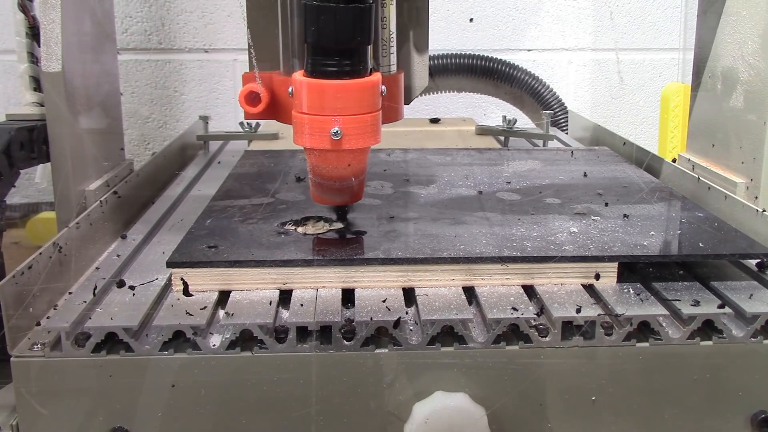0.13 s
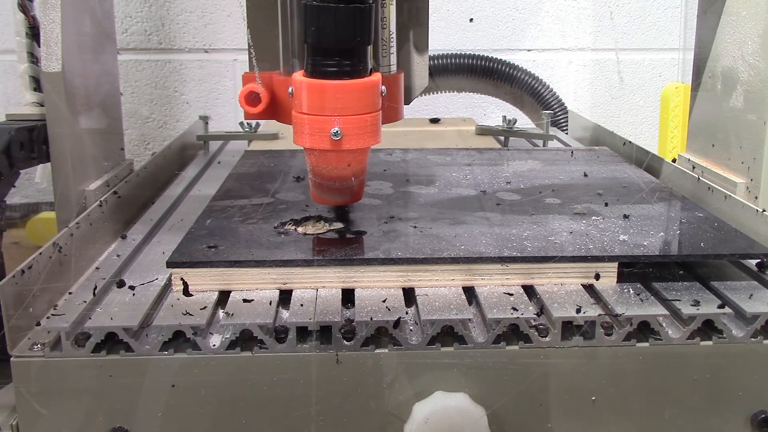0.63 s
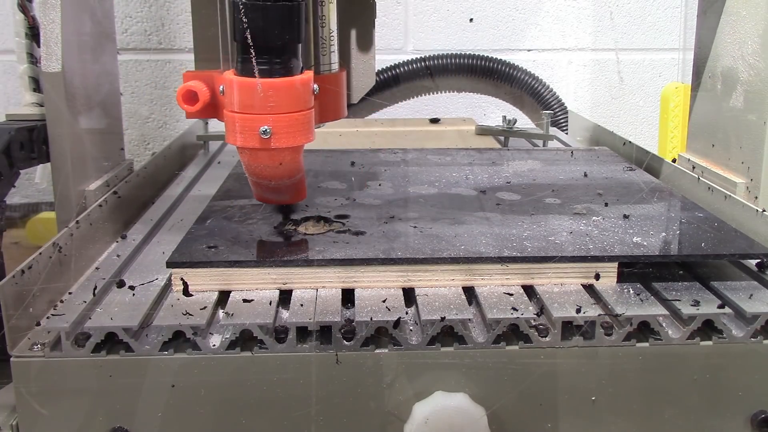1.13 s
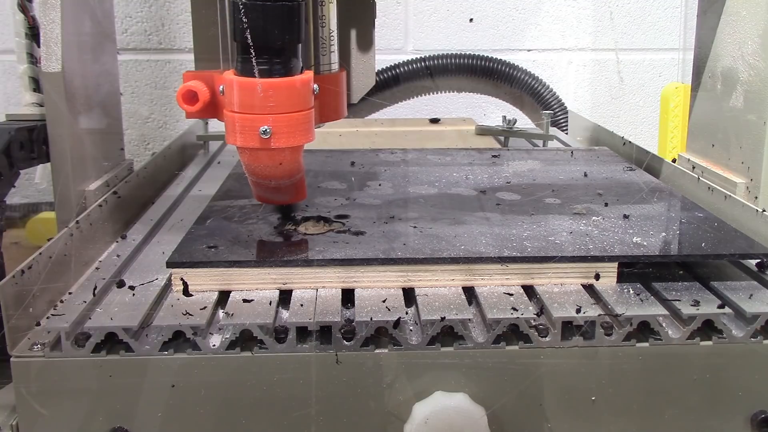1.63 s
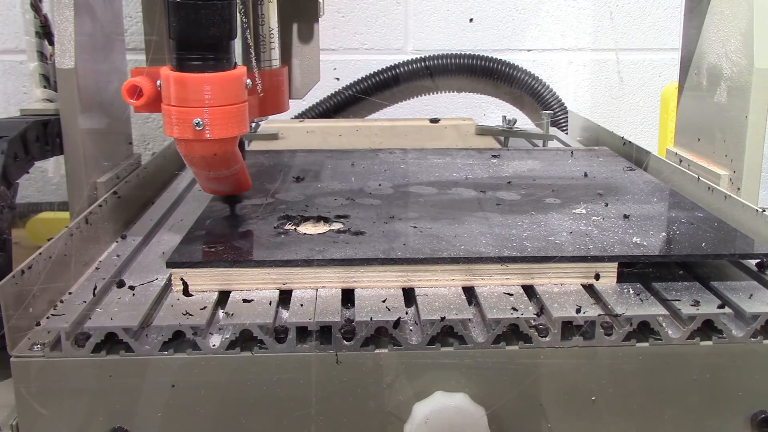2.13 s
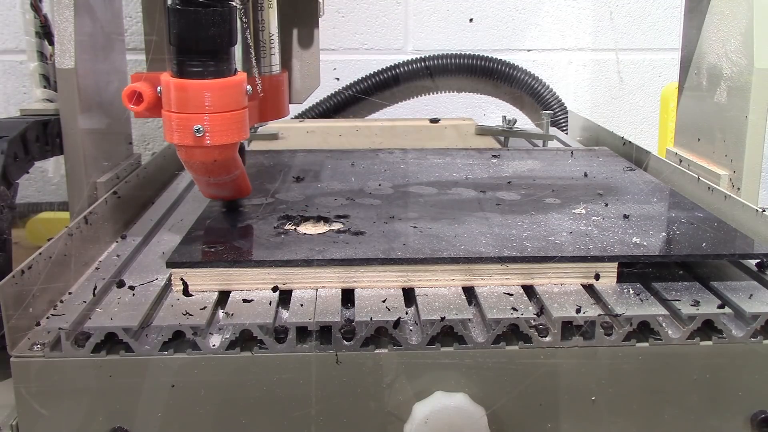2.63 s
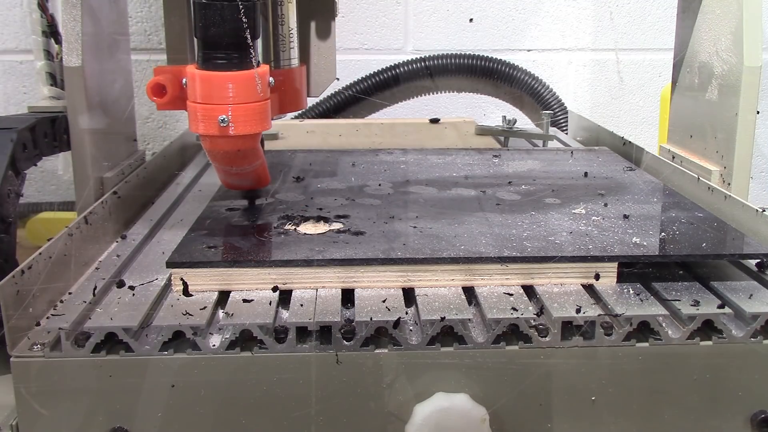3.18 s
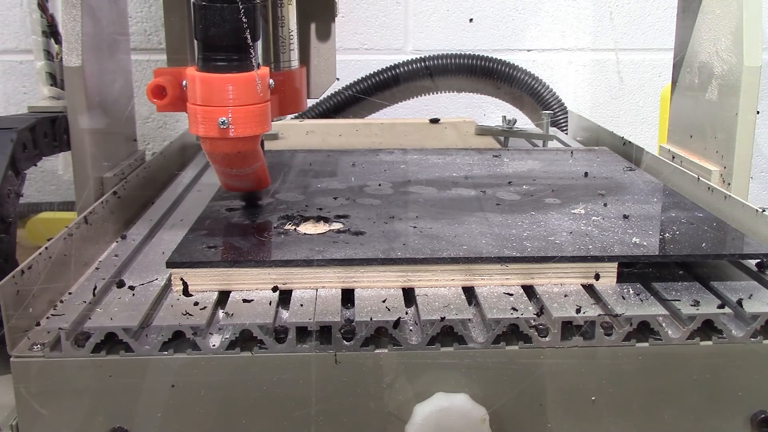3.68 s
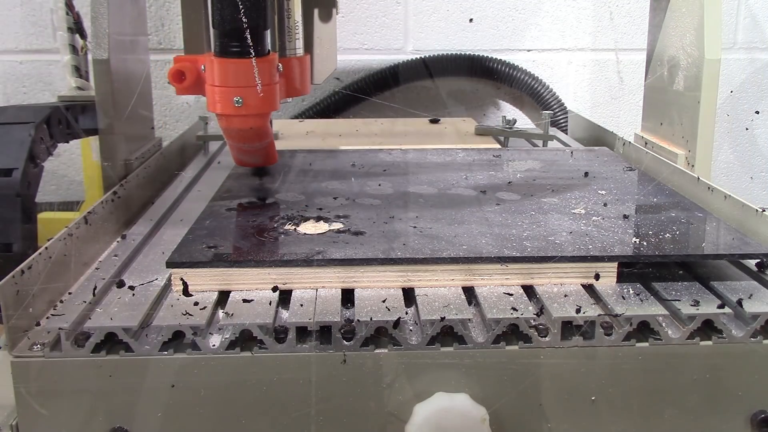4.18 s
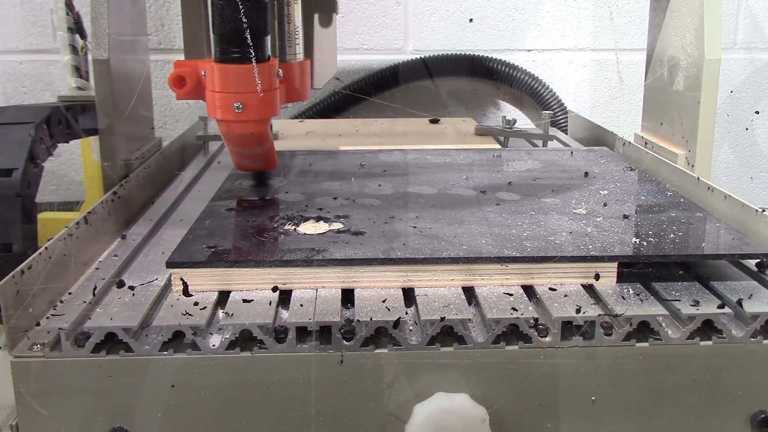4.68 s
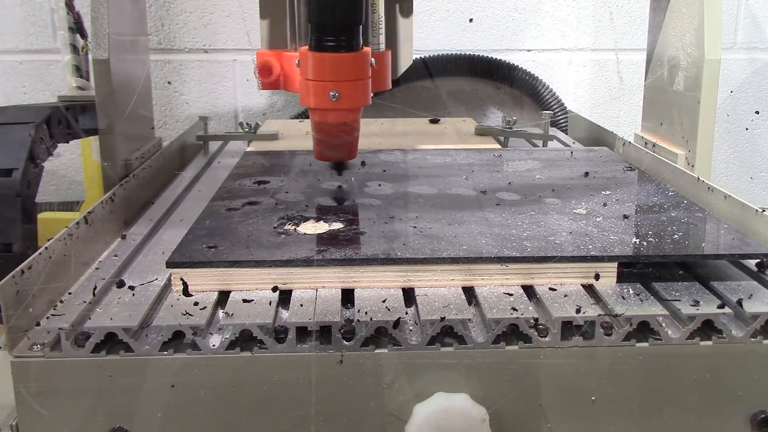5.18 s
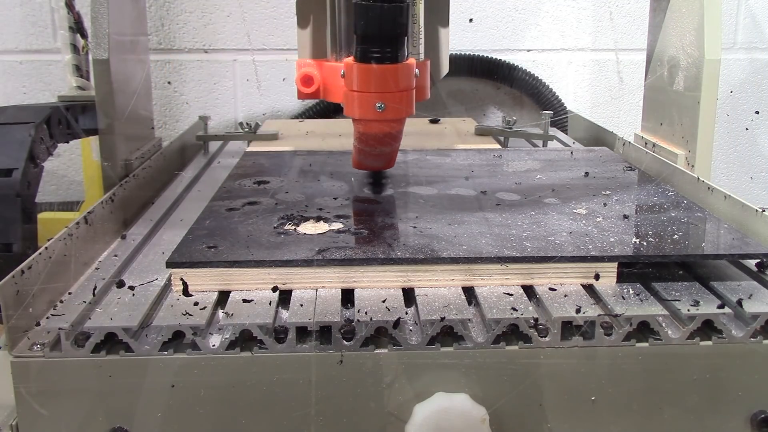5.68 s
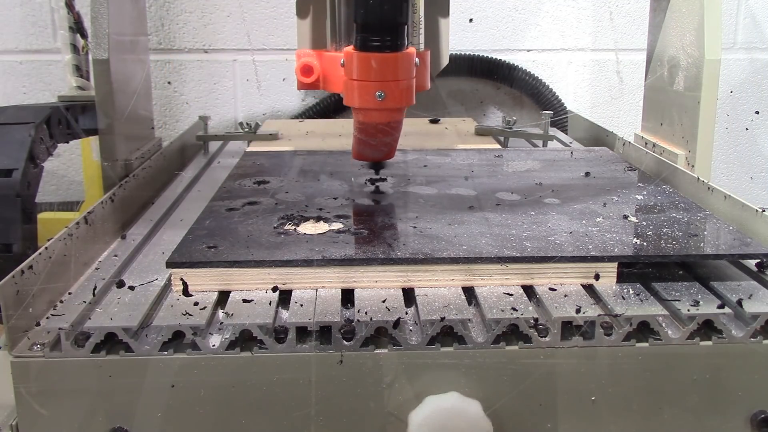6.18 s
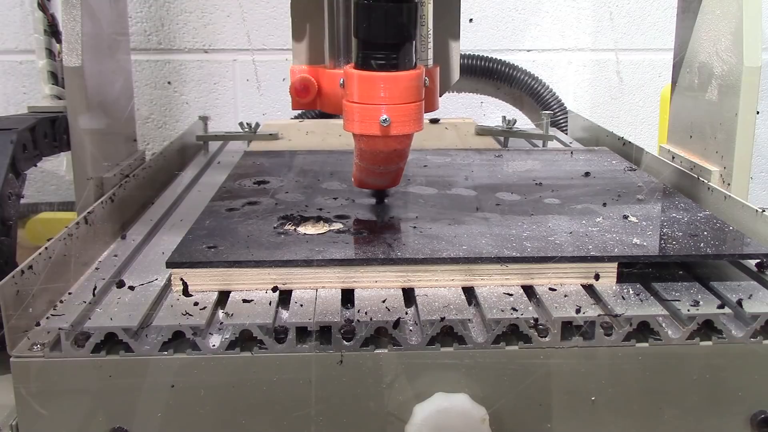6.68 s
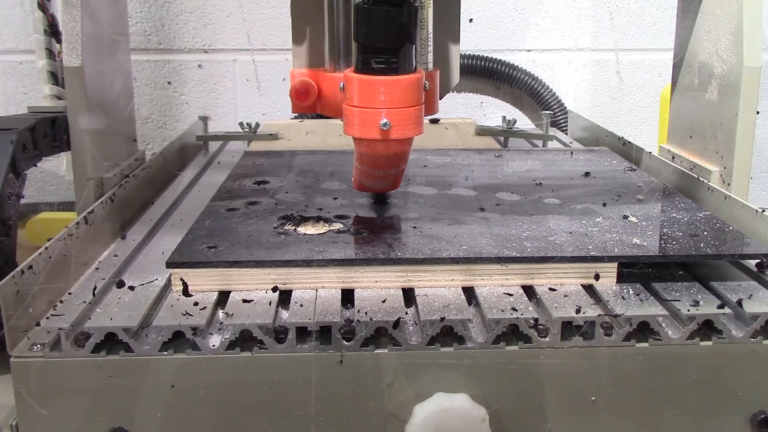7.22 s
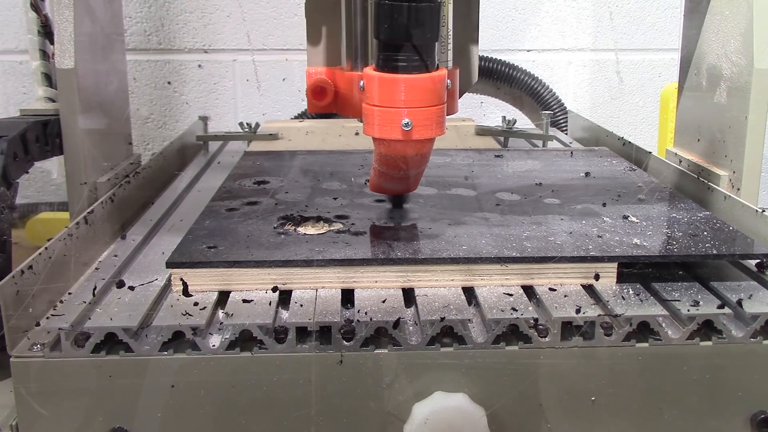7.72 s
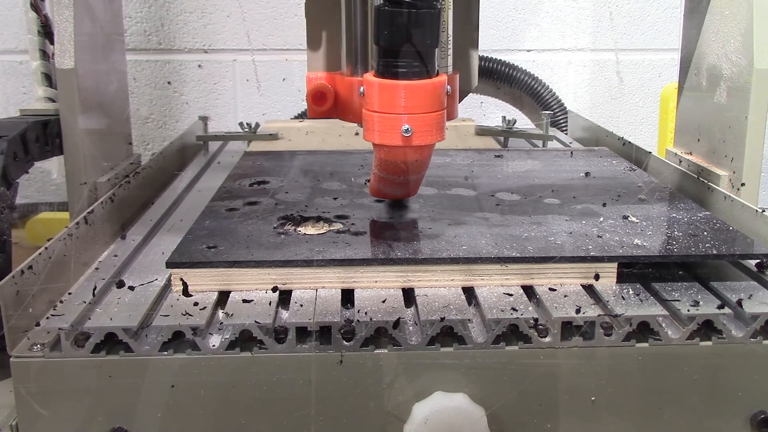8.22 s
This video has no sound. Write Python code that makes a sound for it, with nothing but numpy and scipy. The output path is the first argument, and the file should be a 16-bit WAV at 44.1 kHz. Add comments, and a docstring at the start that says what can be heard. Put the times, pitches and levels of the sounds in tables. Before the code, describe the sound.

A small CNC router drills plastic in a hard workshop, close and dry. Throughout, steady bright hiss with weaker low rumble lies under a louder, almost pure whistle around 15 kHz, trembling slightly, creeping upward and weakening toward the end. A faint mid-low shaft hum and thin motor tones hide beneath. Immediately, stepper motors chirp for about 0.15 seconds, pitch racing up, holding and dropping. Soft dull knocks follow at 0.4, 0.55, 0.8 and 1 second. Another chirp comes at 2.1, a very short one at 3.1, a longer one at 4.1. From 0.8 to 6.4, tiny falling high ticks flare irregularly on a flickering whine, clustering around 2 to 4. The hum sags near 5, with soft knocks. Brief and longer chirps come at 6.2 and 6.45, stronger knocks around 7.4 to 7.5, a short chirp at 7.6, and a last knock at 8.3.

```python
"""A small CNC router drills a plastic sheet in a hard workshop, one microphone close by.
From the start a loud, very high sine whistles over coloured noise, the hiss of air and spindle; the shaft hums.
At once the stepper motors chirp, a swept stack of harmonics, as on each later rapid move; a thin whine flickers.
Soon decaying low sines knock softly on the bed, and short falling bursts flare on the whine until past 6 s.
Meanwhile the whistle creeps up and weakens, the shaft sags near 5 s, and the last knocks close the scene."""
import sys
import numpy as np
from scipy import signal
from scipy.fft import rfft, irfft, next_fast_len
from scipy.io import wavfile
from scipy.ndimage import uniform_filter1d

SR = 44100
rng = np.random.default_rng(int(sys.argv[2]) if len(sys.argv) > 2 else 0)


def put_to_file(sound):
    """Save the sound as 16-bit audio at rate SR, in the file named by the first command-line argument."""
    columns = np.atleast_2d(sound).T  # one column per channel
    safe = np.clip(columns, -1, 1)
    whole_steps = np.round(safe * 32767)
    wavfile.write(sys.argv[1], SR, whole_steps.astype(np.int16))


def gain_from_db(level_db):
    """Convert decibel levels to linear amplitude factors (20 dB per decade)."""
    decades = np.asarray(level_db, float) / 20
    return 10 ** decades


N = 367794
TIME = np.arange(N) / SR


def curve(table):
    """Columns of a table, after the time column, as sample-by-sample curves."""
    s, *columns = np.transpose(table)
    return [np.interp(TIME, s, c) for c in columns]


def steps(table, slew_s):
    """A level that holds from one row to the next and slides over in slew_s."""
    s, db = np.transpose(table)
    held = db[np.searchsorted(s, TIME, "right") - 1]
    return uniform_filter1d(held, int(slew_s * SR), mode="nearest")


def colour(points, hz):
    """dB of a spectrum at the given frequencies, straight on a log axis."""
    f, db = np.transpose(points)
    return np.interp(np.log(hz + 1), np.log(f), db)


def walk(rate):
    """Random levels held 1 / rate s and slewed twice; spread near 1."""
    k = int(SR / rate)
    held = np.repeat(rng.standard_normal(N // k + 1), k)
    return 1.3 * uniform_filter1d(uniform_filter1d(held, k), k)[:N]


def tone(hz, db):
    """A sine of moving pitch and rms level, from a random phase."""
    turns = rng.random() + np.cumsum(hz + 0 * TIME) / SR
    return np.sqrt(2) * gain_from_db(db) * np.sin(2 * np.pi * turns)


def whistle():
    """A nearly pure tone that wanders and trembles a little; it weakens whenever it strays upward."""
    # course of the whistle: t/s, f/Hz, level/dB
    whistle_course = [(0.0, 14840, -27.4), (0.44, 14857, -27.3), (0.68, 14842, -27.3), (1.22, 14855, -27.4),
                      (2.1, 14854, -26.8), (2.2, 14867, -27.8), (2.66, 14838, -27.2), (3.44, 14855, -27.5),
                      (3.9, 14841, -27.1), (4.14, 14876, -28.3), (4.3, 14868, -26.9), (4.66, 14901, -28.3),
                      (4.76, 14878, -27.6), (5.1, 14904, -28.3), (5.46, 14882, -27.7), (5.96, 14911, -28.8),
                      (6.06, 14902, -27.7), (6.8, 14898, -29.3), (7.2, 14877, -27.8), (7.42, 14907, -30.0),
                      (7.58, 14911, -30.5), (7.8, 14894, -28.7), (8.2, 14905, -29.5), (8.33, 14907, -30.6)]
    sag_db_per_hz = .04
    converter_hz, folded_db = 48000, -73.5
    hz, db = curve(whistle_course)
    wander_hz = 2.8 * walk(11.)
    hz = hz + wander_hz + 2.5 * walk(40.)
    # its ultrasonic third harmonic folds down around the converter rate, louder as the pitch rises
    folded = tone(converter_hz - 3 * hz, folded_db + .1 * (hz - hz.mean()) + walk(10.))
    tremble_db = .2 * walk(12.) + .15 * walk(30.)
    return tone(hz, db - sag_db_per_hz * wander_hz + tremble_db) + folded


def hiss():
    """Smooth turbulent noise, coloured by the machine's resonances."""
    # overall noise: t/s, level/dB
    hiss_level = [(0, -38.5), (1.2, -37), (2.1, -36.5), (2.4, -37.5), (5.6, -37.5), (7.0, -37), (8.34, -37)]
    # relative spectrum of motor and air rumble: f/Hz, level/dB
    rumble = [(20, -15), (45, -13.5), (140, -15), (230, -17.5), (330, -15), (560, -14), (1432, -12.5),
              (2353, -18.5), (3095, -16), (3854, -23), (4005, -20.5)]
    # relative spectrum of the high hiss, with a steep upper cut-off near 18.2 kHz: f/Hz, level/dB
    high_hiss = [(4301, -21), (6966, -7), (9275, -4.5), (11423, -9.0), (11560, -13), (11650, -18),
                 (11790, -19.5), (13684, -7.5), (16107, -1), (16365, -3.5), (17996, -6.5), (18100, -11),
                 (18200, -27), (18300, -28), (18520, -60)]
    # resonances and cancellations of frame, sheet and walls: f/Hz, width/Hz, level/dB
    frame = [(420, 80, 1.6), (484, 50, 1.0), (549, 80, 4.4), (743, 130, -3.0), (904, 130, -1.5),
             (1227, 200, 2.0), (1518, 80, -1.5), (2035, 200, 1.5), (2487, 200, -1.2), (2713, 130, 2.1),
             (2972, 130, 1.3), (7750, 130, 2.5), (4167, 200, 2.6), (4587, 320, -2.1), (5006, 200, 4.6),
             (5523, 200, 2.6), (5879, 130, -2.3), (6105, 500, -2.7), (6525, 200, -2.5), (7235, 500, 1.2),
             (8236, 500, -3.4), (8915, 320, 2.7), (10110, 320, -2.4), (10530, 200, 4.2), (11854, 200, -1.9),
             (12209, 130, -4.4), (12500, 200, 1.7), (13404, 500, 3.8), (14115, 130, -2.9),
             (17506, 200, 4.4)]
    size = next_fast_len(N)
    hz = np.arange(size // 2 + 1) * SR / size
    db = colour(rumble + high_hiss, hz)
    for f, width, gain_db in frame:
        db = db + gain_db * np.exp(-4 * np.log(2) * ((hz - f) / width) ** 2)
    noise = irfft(rfft(rng.standard_normal(size)) * gain_from_db(db), size)[:N]
    return noise / noise.std() * gain_from_db(curve(hiss_level)[0] + 0.4 * walk(8.))


def steppers():
    """The step rate ramps up, holds and ramps down; its harmonics sweep along."""
    # rapid moves: start t/s, stop t/s, full step rate f/Hz,
    # second harmonic level/dB before gantry and swell, third harmonic level/dB at full speed
    moves = [(0.0115, 0.165, 3163.5, -44.5, -52), (2.0755, 2.237, 2233.5, -42, -65),
             (3.1155, 3.1985, 3163.5, -49, -58), (4.0765, 4.3405, 3163.5, -52, -55),
             (6.165, 6.22, 2600.0, -54, -65), (6.441, 6.706, 3163.5, -49, -49.5),
             (7.583, 7.6655, 3163.5, -47.5, -57)]
    # how the gantry radiates the even harmonics: f/Hz, level/dB
    gantry = [(2500, -32), (4000, -22), (4467, -14), (4800, -11), (5050, -2), (5600, 0), (6000, -1.5),
              (6327, -5.5), (6700, -13), (8000, -25)]
    ramp_s = .0275
    out = 0
    for start, stop, top_hz, second_db, third_db in moves:
        speed = np.clip(np.minimum(TIME - start, stop - TIME) / ramp_s, 0, 1)
        way = np.clip((TIME - start) / (stop - start), 0, 1) - .5
        # harder pull while speeding up or braking
        pull_db = 2.5 * np.clip(10 * (1 - speed), 0, 1)
        # the step tone partly follows the third harmonic
        first_db = -39 + .5 * third_db
        # the fourth follows the second, is stronger in fast moves,
        # and fades along the way as the second swells
        fourth_db = second_db - 17.5 + .007 * top_hz - 3.5 * way
        harmonics_db = first_db, second_db + 3 * way + pull_db, third_db, fourth_db
        for k, db in enumerate(harmonics_db, 1):
            hz = k * top_hz * speed
            if k % 2 == 0:  # even harmonics ring the gantry as they pass
                gain = gain_from_db(colour(gantry, hz)) * (speed > 0)
            else:  # odd ones emerge only near full speed
                gain = speed ** 6
            out = out + gain * tone(hz, db + 1.2 * walk(40.))
    return out


def knocks():
    """Soft blows, swelling within ms and dying in tens of ms, ring a low mode of the bed."""
    # blows: t/s, envelope peak level/dB, f/Hz
    blows = [(0.406, -52, 573), (0.547, -50, 544), (0.818, -50, 466), (0.966, -50.5, 476),
             (1.998, -52, 511), (4.91, -53, 520), (5.155, -55, 288), (6.211, -54, 497), (6.379, -52, 388),
             (7.356, -46, 502), (7.5, -47, 554), (7.509, -44.5, 494), (8.315, -46, 507)]
    rise_s, t60_s = 0.0053, 0.048
    out, t = np.zeros(N + SR), TIME[:SR // 8]
    shape = (1 - np.exp(-t / rise_s)) * np.exp(-np.log(1000) * t / t60_s)
    for s, peak_db, hz in blows:
        i = int(s * SR)
        out[i:i + len(t)] += gain_from_db(peak_db) * shape / shape.max() * np.sin(2 * np.pi * hz * t)
    return out[:N]


def whine():
    """A thin flickering driver tone switches between levels; each flare is a short burst that slides down."""
    # the steady whine: from t/s, level/dB
    whine_level = [(0, -66.5), (3.83, -60), (5.17, -65.5), (5.95, -61), (6.36, -68), (7.8, -64.5)]
    # flares: t/s, envelope peak level/dB
    flares = [(0.7781, -51), (0.9594, -54), (1.8537, -50), (2.0058, -47), (2.3735, -51), (2.7551, -51),
              (2.8828, -49), (3.049, -47), (3.5994, -53), (3.7155, -50), (3.8432, -49), (4.0294, -52),
              (4.9894, -49), (5.1437, -51), (6.1994, -50), (6.3694, -53)]
    out = tone(12139 + 3.7 * walk(10.), steps(whine_level, .06) + 1.4 * walk(30.))
    t = TIME[:SR // 20]
    # from 12170 Hz, falling by 7000 Hz/s
    slide = np.sin(2 * np.pi * (12170 * t - 3500 * t ** 2))
    burst = slide * np.exp(-((t - .008) / .007) ** 2)
    for s, peak_db in flares:
        i = int(s * SR)
        out[i:i + len(t)] += gain_from_db(peak_db) * burst
    return out


def spindle():
    """The shaft tone comes and goes, the resting motors sing thinly, the higher motor tones hold steady."""
    # shaft tone, sagging under load: t/s, f/Hz, level/dB
    shaft_course = [(0, 567, -66), (0.65, 567, -63), (2.4, 567, -67), (3.6, 566, -68), (4.2, 560, -68.5),
                    (5.05, 553, -70), (5.2, 566, -70), (5.8, 566, -75), (8.34, 565, -73)]
    # thin tone of the resting motors that changes with their position: from t/s, level/dB
    hold_level = [(0, -70), (1.1, -64), (2.15, -76), (3.15, -68.5), (5.2, -75)]
    # steady motor tones: f/Hz, level/dB
    motor_tones = [(2274, -69), (4548, -78.5), (6823, -67)]
    hz, db = curve(shaft_course)
    shaft = tone(hz + 1.2 * walk(8.), db + 1.2 * walk(20.))
    holding = tone(5084, steps(hold_level, .1) + walk(5.6))
    steady = sum(tone(f, tone_db + 1.1 * walk(5.)) for f, tone_db in motor_tones)
    return shaft + holding + steady


def scene():
    """All sources, close to one microphone."""
    return (whistle() + hiss() + steppers() + knocks() + whine() + spindle())[None]


def roll_off(x):
    """The treble ends steeply here."""
    return signal.sosfilt(signal.butter(12, 18550, fs=SR, output="sos"), x)


def record(dry):
    """The microphone's mix, with no room or gain added."""
    return roll_off(dry)


dry = scene()
out = record(dry)
put_to_file(out)
```